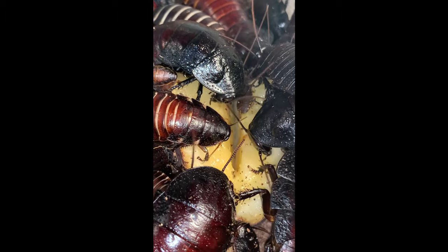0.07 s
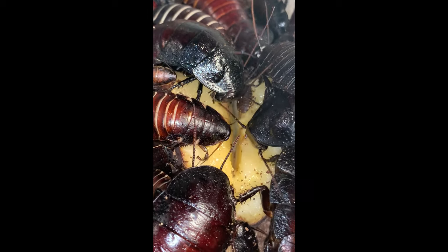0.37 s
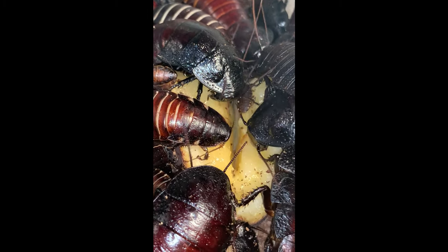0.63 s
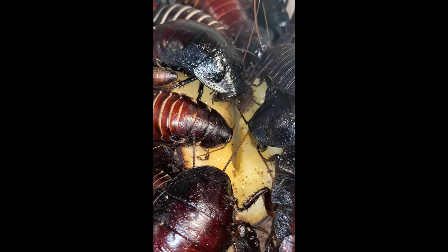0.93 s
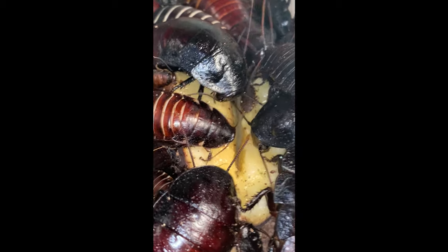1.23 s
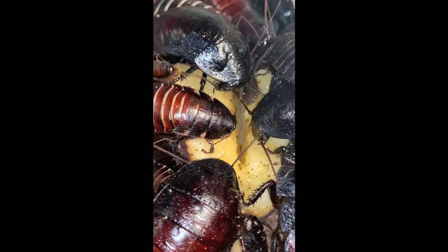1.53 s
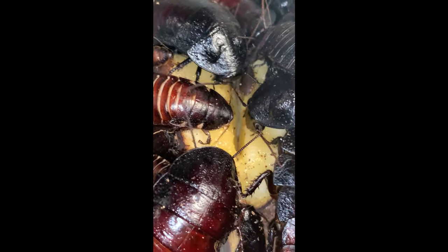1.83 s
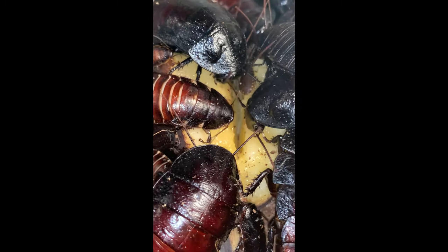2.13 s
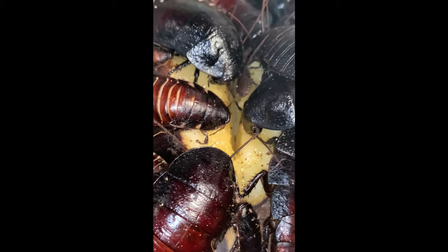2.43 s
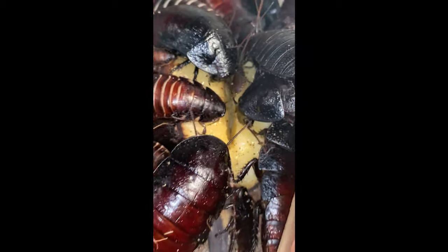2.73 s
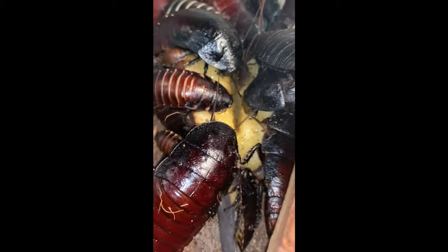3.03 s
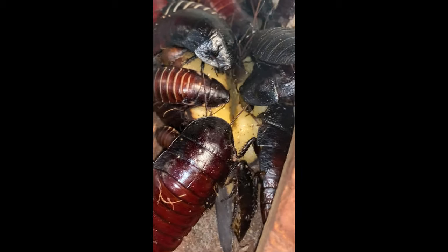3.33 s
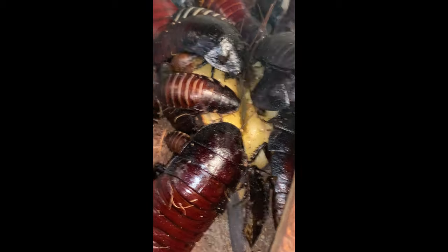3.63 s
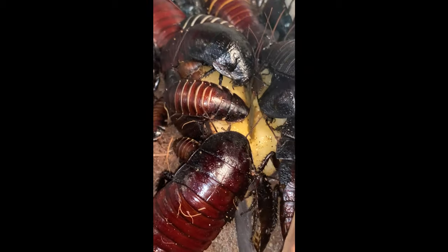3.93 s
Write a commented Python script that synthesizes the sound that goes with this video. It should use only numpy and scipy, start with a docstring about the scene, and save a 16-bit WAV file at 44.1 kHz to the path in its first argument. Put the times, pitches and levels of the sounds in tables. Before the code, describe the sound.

A large cockroach gives one long, rough hiss in a tub. Before and after it, crowding insects shuffle faintly, with sharp ticks and leg scrapes, over low rumble and soft bumps on a close handheld microphone.

```python
"""Large cockroaches crowd over fruit in a tub, close to a handheld camera.
From the start, bodies shuffle and feet squeak faintly over a low rumble of hands on the camera.
Jaws and shells soon give sharp ticks, legs scrape, and soft bumps come through the camera body.
At about 2.4 s one long rough hiss swells, whistles briefly and makes the tub ring.
It stops by about 3.3 s; a few more ticks, scrapes and bumps follow."""
import sys
import numpy as np
from scipy import signal
from scipy.fft import rfft, irfft
from scipy.io import wavfile
from scipy.ndimage import uniform_filter1d

SR = 44100
rng = np.random.default_rng(int(sys.argv[2]) if len(sys.argv) > 2 else 0)


def wrap_up_sound(samples):
    """Save the sound to the file named by the first command line argument, as 16-bit audio."""
    columns = np.atleast_2d(samples).T
    # keep every value between -1 and 1, then stretch to whole-number steps
    tamed = np.clip(columns, -1, 1)
    steps = np.round(tamed * 32767).astype(np.int16)
    wavfile.write(sys.argv[1], SR, steps)


N = 176400  # 4 seconds
T, HZ = np.arange(N) / SR, np.fft.rfftfreq(N, 1 / SR)


def amp(db):
    """Turns decibels into a number to multiply by."""
    return 10 ** (np.asarray(db) / 20)


def unit(x):
    """Scales a signal to an average size (rms) of 1."""
    return x / np.sqrt(np.mean(x ** 2) + 1e-20)


def at_hz(table, hz):
    """Looks up a table by frequency, sliding between rows in even steps of pitch."""
    row_hz, value = np.transpose(table)
    return np.interp(np.log(hz + 1), np.log(row_hz + 1), value)


def level(table, column=1, outside_db=None):
    """Gives one level column of a table at every sample, sliding between rows."""
    rows = np.array(table)
    return np.interp(T, rows[:, 0], rows[:, column], outside_db, outside_db)


def add(mix, start, sound):
    """Mixes in a stereo sound at a start time in seconds."""
    part = mix[:, max(round(start * SR), 0):][:, :sound.shape[1]]
    part += sound[:, :part.shape[1]]


# How much louder the left side is: (frequency [Hz], left minus right [dB])
BALANCE = [(40, -1), (90, -3.5), (150, -6), (240, -6), (400, 0), (900, 0.5), (1500, -0.5), (16000, 0.5)]
def mic_gains(hz):
    """How strongly the left and right microphones pick up a frequency."""
    return amp(np.array([[.5], [-.5]]) * at_hz(BALANCE, hz))


# How alike the two sides sound: (frequency [Hz], likeness [0 to 1])
SIDE_LIKENESS = [(50, 1), (200, 0.92), (400, 0.83), (1000, 0.83), (4000, 0.17), (6500, 0.69), (8300, 1),
                 (10500, 0.35), (12400, 0.32), (14000, 0.59), (15500, 0.45)]
# How far the left wave runs ahead of the right: (frequency [Hz], lead [radians])
LEFT_LEAD = [(50, -.1), (200, -.3), (310, -.8), (450, -.6), (600, .5), (830, .8), (920, 1.3), (1050, 2.1),
             (3000, 2.3), (5500, 3.4), (8200, 6.28), (11800, 9.2), (15500, 12.5)]
def noise(colour, size=N):
    """Stereo noise of size 1; its colour says how strong each frequency is."""
    hz = np.fft.rfftfreq(size, 1 / SR)
    left, other = rng.standard_normal((2, len(hz))) + 1j * rng.standard_normal((2, len(hz)))
    same = np.clip(at_hz(SIDE_LIKENESS, hz), 0, 1)
    right = (same * left + np.sqrt(1 - same ** 2) * other) * np.exp(-1j * at_hz(LEFT_LEAD, hz))
    return unit(irfft(np.array([left, right]) * mic_gains(hz) * colour, size))


def flutter(depth_db, rate_hz):
    """A loudness that wavers at random, mostly slower than the given rate."""
    wobble = irfft(rfft(rng.standard_normal(N)) / (1 + (HZ / rate_hz) ** 2), N)
    return unit(amp(depth_db * unit(wobble)))


def patchy(x, depth_db=2.2, patch_hz=260, patch_s=.09):
    """Makes random patches of time and frequency a little louder or softer."""
    spectra = signal.stft(x, nperseg=1024, noverlap=768)[2]
    patches = rng.standard_normal(spectra.shape[1:])
    patches = uniform_filter1d(patches, int(patch_hz * 1024 / SR), axis=0)
    patches = uniform_filter1d(patches, int(patch_s * SR / 256), axis=1)
    spectra *= amp(depth_db * unit(patches))
    return unit(signal.istft(spectra, nperseg=1024, noverlap=768)[1][:, :N])


def swell(t, rise):
    """Grows smoothly, peaks at the rise time and dies away."""
    return (t / rise * np.exp(1 - t / rise)) ** 2


def echoes(x, fade_s):
    """A blur of echoes, different on each side, that falls 60 dB in the fade time."""
    t = T[:SR // 2]
    bounces = rng.standard_normal((2, len(t))) * amp(-60 * t / fade_s) * np.minimum(t / 0.00073, 1)
    return signal.fftconvolve(x, bounces / np.linalg.norm(bounces[0]), axes=1)[:, :N]


def noise_swells(rows, size=16384):
    """Short grainy swells of noise, each around its own pitch."""
    out, hz = np.zeros((2, N)), np.fft.rfftfreq(size, 1 / SR)
    for start, rise, db, centre_hz, octaves in rows:
        band = 1 / (1 + (np.log2((hz + 1) / centre_hz) / octaves) ** 2)
        band /= 1 + (hz / 9500) ** 8  # softens the top
        add(out, start, amp(db) * np.sqrt(swell(T[:size], rise)) * noise(band, size))
    return out * flutter(depth_db=.5, rate_hz=250)


# Tone of the room's air: (frequency [Hz], relative level [dB])
AIR_TONE = [(300, -21), (650, -21), (850, -23), (1400, -26.5), (1700, -15), (2800, -22), (4000, -19),
            (5200, -21.5), (7000, -21.5), (9500, -20.5), (12500, -26), (15300, -23), (16500, -18.5)]
def room_air():
    """The air of the room makes a faint, steady noise."""
    return amp(-77) * noise(amp(at_hz(AIR_TONE, HZ)))


# How loudly the crowd moves: (time [s], relative level [dB])
SHUFFLE_LEVELS = [(0, -80), (.4, -73.5), (.76, -83), (.85, -67), (.94, -79.5), (1.05, -72), (1.22, -67),
                  (1.32, -79.5), (1.77, -81.5), (2.37, -83), (2.6, -65), (3.25, -70.5), (3.47, -66),
                  (3.62, -78), (3.72, -69), (4, -94.5)]
# Tone of the moving bodies: (frequency [Hz], relative level [dB])
SHUFFLE_TONE = [(200, -27), (480, -16), (620, -7), (700, 1.5), (790, -8.5), (950, -1), (1130, -7),
                (1320, -5.5), (1500, -10), (2000, -15.5), (4000, -21.5), (8000, -23), (12000, -51)]
def shuffle():
    """Many bodies shuffle about with a dull, uneven rustle."""
    rustle = patchy(noise(amp(at_hz(SHUFFLE_TONE, HZ))))
    return rustle * amp(level(SHUFFLE_LEVELS) + 1.5) * flutter(depth_db=2.56, rate_hz=35)


def foot_squeaks(per_second=80, low_hz=645, high_hz=5920, width_octaves=.16, size=4096):
    """Feet slip with many tiny squeaks, louder while the crowd moves."""
    out, hz = np.zeros((2, N)), np.fft.rfftfreq(size, 1 / SR)
    effort_db = level(SHUFFLE_LEVELS)
    for when, pitch, softness in rng.random((int(per_second * N / SR), 3)):
        centre_hz = low_hz * (high_hz / low_hz) ** pitch
        db = -80 - 2 * np.log(softness + 0.15)
        db -= 2 * np.log2(centre_hz / low_hz)  # higher squeaks are softer
        db += .5 * (effort_db[int(when * N)] - effort_db.mean())
        band = 1 / (1 + (np.log2((hz + 1) / centre_hz) / width_octaves) ** 4)
        add(out, when * N / SR, amp(db) * swell(T[:size], rise=.009) * noise(band, size))
    return out


# Loudness of the handling: (time [s], relative rumble level [dB], relative deep bass level [dB])
HANDLING_LEVELS = [(0.0, -62.5, -59.5), (0.48, -60, -64), (0.8, -64.5, -71.5), (1.05, -64, -55),
                   (1.09, -41.5, -77), (1.12, -58, -42.5), (1.18, -54.5, -54), (1.79, -66.5, -70),
                   (1.83, -65.5, -57), (2.02, -61, -69), (2.35, -63, -57), (2.51, -33.5, -54),
                   (2.53, -35, -44.5), (2.65, -41, -67), (2.86, -37, -56.5), (3.91, -62, -61),
                   (3.95, -48, -60), (4.0, -32.5, -40.5)]
# Tone of the rumble: (frequency [Hz], relative level [dB])
RUMBLE_TONE = [(45, -36), (70, -1), (110, -2), (150, 3), (220, -1.5), (280, -7), (350, -21), (600, -30),
               (1200, -90)]
# Tone of the deep bass under it: (frequency [Hz], relative level [dB])
BASS_TONE = [(15, -38), (33, -40), (46, 8), (55, 7), (75, -4.5), (110, -11.5), (250, -53)]
def handling_rumble():
    """Hands send a low rumble and a deeper bass through the camera body."""
    rumble = noise(amp(at_hz(RUMBLE_TONE, HZ))) * amp(level(HANDLING_LEVELS, 1) - 2)
    bass = noise(amp(at_hz(BASS_TONE, HZ))) * amp(level(HANDLING_LEVELS, 2) + 2.5)
    return rumble + bass


# Ticks of jaws and shells, all levels relative:
# (time [s], level [dB], ring pitch [Hz], ring level [dB], low snap level [dB])
SHELL_TICKS = [(0.1423, -48, 7400, 3, -21), (.1474, -26.5, 7600, 5, -38), (0.444, -46, 9000, -4, -9),
               (0.4457, -33, 9050, 8.5, -3.5), (.4631, -37.5, 5000, -18, -18), (.4342, -55, 8500, -1, -15),
               (0.5105, -44, 7400, -1, -23), (0.5174, -28, 7100, 4, -27), (.8411, -45, 7400, 2, -22),
               (0.8463, -30.5, 7300, 4.5, -39), (0.9322, -52, 7400, -23, -14),
               (1.0118, -33.5, 8960, 8.5, -2), (1.1614, -34.5, 7050, 7, -34), (1.2289, -48, 4200, 12, -8),
               (1.442, -54.5, 9600, -8, -26), (1.56, -46.5, 9800, 1, -5), (1.6225, -34.5, 9140, 4.5, -9),
               (1.6308, -32, 5100, -13, -5.5), (2.1931, -34.5, 8700, -1, -14),
               (2.2002, -36.5, 6300, -14, -4.5), (2.4468, -45, 6970, 20, -17), (3.2197, -43, 8300, -16, -3),
               (3.2255, -37, 8200, -13, -2), (3.3535, -25.5, 8140, 6, -47), (3.473, -60, 5800, -4, -20),
               (3.652, -41.5, 7700, 4, -4), (3.6676, -41.5, 7700, -4, 6)]
# Tone that all ticks share: (frequency [Hz], relative level [dB])
TICK_TONE = [(300, -40), (1500, -25), (3000, -12.5), (4300, 7), (5700, -6.5), (7000, 0.5), (9000, -12),
             (10500, -6.5), (12500, -9), (15200, -1.5), (16500, -30)]
# Echoes off the tub's walls: (delay [s], strength [0 to 1])
WALL_ECHOES = [(.00092, .42), (.0018, .2), (.0029, .14)]
def shell_ticks(ring_width_hz=1240, snap_hz=2650, snap_width_hz=1100, size=1024):
    """Each snap rings a shell for an instant, then bounces round the tub and the room."""
    clicks, hz = np.zeros((2, N)), abs(np.fft.fftfreq(size, 1 / SR))
    for start, db, ring_hz, ring_db, snap_db in SHELL_TICKS:
        ring = amp(ring_db) / (1 + ((hz - ring_hz) / ring_width_hz) ** 4)
        snap = amp(snap_db) * 2 / (1 + ((hz - snap_hz) / snap_width_hz) ** 4)
        log_gain = np.log(amp(at_hz(TICK_TONE, hz)) + ring + snap)
        # the most sudden pulse that has this tone
        pulse = np.fft.ifft(np.exp(np.conj(signal.hilbert(log_gain)))).real
        add(clicks, start, np.array([pulse, pulse]) * amp(db + 8.5) / np.linalg.norm(pulse))
    walls = 1 + sum(gain * np.exp(-2j * np.pi * HZ * delay) for delay, gain in WALL_ECHOES)
    mic_delay_s = np.array([[0], [.00012]])  # the right side hears it later
    near = irfft(rfft(clicks) * walls * np.exp(-2j * np.pi * HZ * mic_delay_s), N)
    tub = amp(-5) * echoes(clicks, fade_s=.02)
    room = amp(-20) * echoes(clicks, fade_s=.2)
    return near + tub + room


# Strokes of the legs: (time [s], rise time [s], level [dB], pitch [Hz], half width [octaves])
LEG_STROKES = [(.15, 0.014, -69.5, 4000, 2), (.251, 0.0064, -66, 3420, 0.16),
               (0.343, .013, -65.5, 3170, 0.28), (.35, 0.0047, -71, 6400, 0.31),
               (.42, 0.049, -69.5, 2960, 2.4), (.52, 0.012, -70, 3500, 1), (.81, 0.036, -72, 1290, 1.4),
               (1.015, 0.037, -67, 1440, 0.8), (1.115, 0.024, -67, 6800, 0.66),
               (1.195, 0.019, -70, 6660, 0.78), (1.185, 0.018, -73, 900, 0.32),
               (1.211, 0.017, -63, 2650, 1.1), (1.31, 0.0044, -75, 2540, .08),
               (1.378, .014, -76, 5100, 0.052), (1.835, 0.0096, -77, 3500, 0.66),
               (1.845, 0.0073, -69, 1140, 0.28), (1.9, 0.006, -73, 2040, 0.6),
               (1.924, 0.0096, -66, 510, 0.56), (2.029, .012, -73, 2300, 0.8),
               (3.288, 0.0046, -60.5, 770, 0.3), (3.355, 0.025, -63, 5500, 1.9),
               (3.381, 0.013, -64, 1550, .7), (3.648, 0.018, -61, 6940, 0.28),
               (3.65, 0.021, -62.5, 2360, 1.5), (3.86, 0.019, -73.5, 890, 0.22),
               (3.943, 0.0056, -52, 616, 0.22)]
def leg_scrapes():
    """Rubbing legs make short, grainy scrapes."""
    return noise_swells(LEG_STROKES)


# Bumps on the camera: (time [s], level [dB], middle pitch [Hz], rise time [s])
CAMERA_BUMPS = [(0.289, -51.5, 103, 0.02), (.433, -40.5, 154, .012), (0.463, -46.5, 181, .008),
                (0.594, -49.5, 144, 0.013), (1.076, -31, 152.3, 0.012), (1.091, -33, 62.7, 0.02),
                (1.264, -49, 233, 0.0064), (1.277, -42, 94, 0.0088), (1.454, -46, 158, 0.0076),
                (1.818, -47, 141, 0.014), (1.925, -52.5, 143, 0.015), (2.186, -51.5, 125, 0.012),
                (2.444, -32.5, 188, 0.008), (2.488, -24, 210.4, 0.012), (2.537, -39, 167, 0.02),
                (2.961, -38, 155.6, 0.02), (3.215, -40, 215.5, 0.014), (3.68, -52, 130, 0.023),
                (3.771, -48, 101, 0.017), (3.946, -27, 225, 0.0061), (3.952, -35, 143.4, 0.015),
                (3.955, -34, 60, 0.013), (3.946, -44.5, 416, 0.011)]
def camera_bumps(sag=.076):
    """Soft bumps come through the camera body as low tones that sag in pitch."""
    out, t = np.zeros((2, N)), T[:SR // 4]
    for start, db, hz, rise in CAMERA_BUMPS:
        falling_hz = hz * (1 + sag * (2 * np.exp(-t / (2 * rise)) - 1))
        tone = np.sin(2 * np.pi * np.cumsum(falling_hz) / SR)
        add(out, start, amp(db) * mic_gains(hz) * swell(t, rise) * tone)
    return out


# Loudness of the hiss: (time [s], relative hiss level [dB], relative tub ring level [dB])
HISS_LEVELS = [(2.42, -104, -102), (2.448, -68.5, -62.5), (2.46, -82, -76.5), (2.53, -70, -60),
               (2.642, -65.5, -79), (2.668, -57, -63.5), (2.804, -57.5, -61.5), (2.878, -54, -51),
               (3.118, -55.5, -55), (3.204, -64.5, -56.5), (3.226, -56.5, -57), (3.25, -73.5, -68),
               (3.34, -76.5, -87)]
# Tone of the hiss itself: (frequency [Hz], relative level [dB])
HISS_TONE = [(590, -46), (1000, -7.5), (1480, -3), (1750, -10.5), (1910, 0.5), (2080, -8.5), (3500, -5),
             (5250, -9), (8450, -12), (10400, -15), (12300, -26.5), (16000, -23)]
# Notes at which the tub rings: (pitch [Hz], width [Hz], relative level [dB])
TUB_NOTES = [(497, 28, -6), (587, 25, -1), (660, 33, -11), (808, 29, -4), (914, 37, 2.5), (1280, 25, -10),
             (1480, 26, -3), (1610, 29, -7), (1950, 18, -13), (2415, 27, -19), (2870, 39, -13),
             (3440, 37, -15.5), (4160, 49, -23), (4320, 60, -15)]
# The tub's broad sound between those notes: (frequency [Hz], relative level [dB])
TUB_TONE = [(250, -22), (350, -12.5), (500, -14.5), (700, -19.5), (820, -6), (930, -20), (1020, -24),
            (2000, -43), (5000, -86)]
def hiss(echo_fade_s=.05):
    """One long rough hiss echoes between the tub's walls and makes the tub ring."""
    air = noise(amp(at_hz(HISS_TONE, HZ)))
    bounces = rng.standard_normal(SR // 10) * amp(-60 * T[:SR // 10] / echo_fade_s)
    echo = signal.fftconvolve(air, bounces[None] / np.linalg.norm(bounces), axes=1)[:, :N]
    air = patchy(air + amp(-9) * echo) * amp(level(HISS_LEVELS, 1, outside_db=-120) + 3.5)
    tub_power = amp(at_hz(TUB_TONE, HZ)) ** 2
    for hz, width, db in TUB_NOTES:
        tub_power += amp(db) ** 2 / (1 + ((HZ - hz) / (width / 2)) ** 2) ** 1.5
    ring = noise(np.sqrt(tub_power)) * amp(level(HISS_LEVELS, 2, outside_db=-120) + 3)
    return (air + ring) * flutter(depth_db=.34, rate_hz=120)


# Whistles in the hiss: (time [s], rise time [s], level [dB], pitch [Hz], half width [octaves])
HISS_WHISTLES = [(2.49, 0.036, -64, 1586, 0.017), (2.65, 0.034, -58.5, 3400, 0.044),
                 (2.83, 0.11, -58, 6110, .05), (3.205, 0.012, -64.5, 3650, 0.025)]
def whistles():
    """Very narrow bands of noise stand out from the hiss as brief whistles."""
    return noise_swells(HISS_WHISTLES)


def scene():
    """Adds up all the sounds at the two microphones."""
    background = room_air() + shuffle() + foot_squeaks() + handling_rumble()
    return background + shell_ticks() + leg_scrapes() + camera_bumps() + hiss() + whistles()


def record(dry, cutoff_hz=16100):
    """Cuts away the very highest treble."""
    low_pass = signal.firwin(255, cutoff_hz, window=("kaiser", 9), fs=SR)
    return signal.oaconvolve(dry, low_pass[None], "same")


dry = scene()
out = record(dry)
wrap_up_sound(out)
```